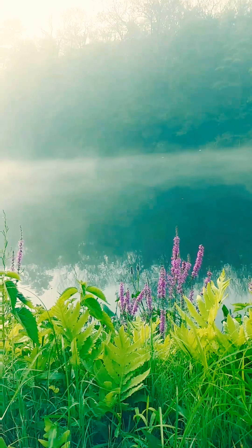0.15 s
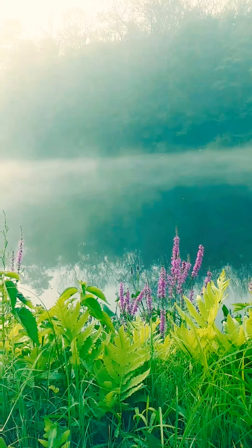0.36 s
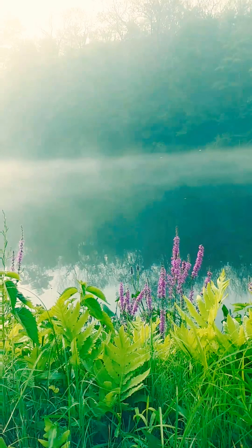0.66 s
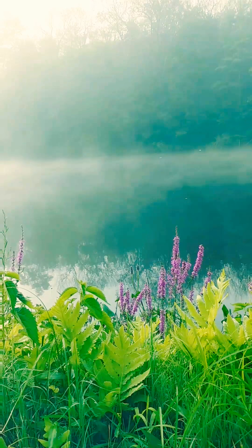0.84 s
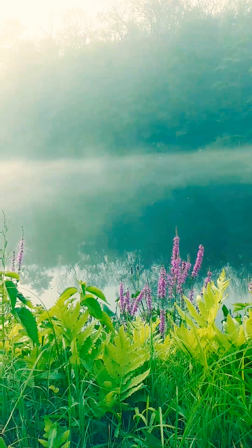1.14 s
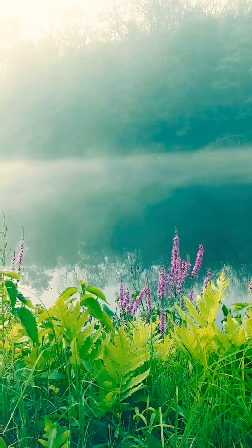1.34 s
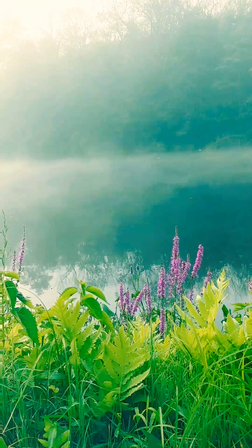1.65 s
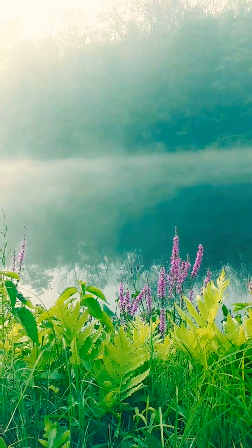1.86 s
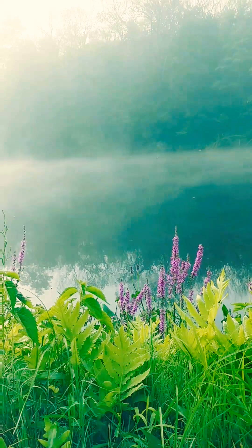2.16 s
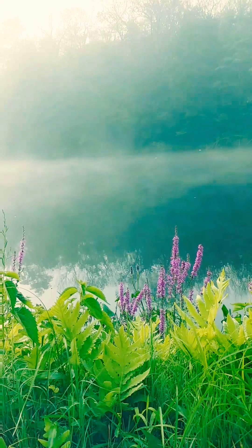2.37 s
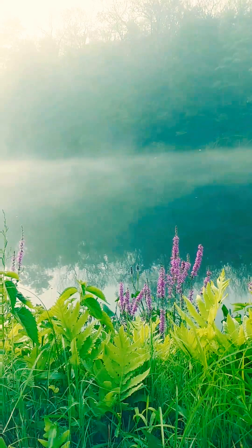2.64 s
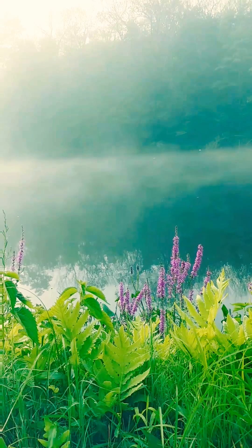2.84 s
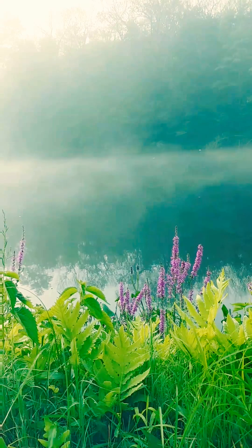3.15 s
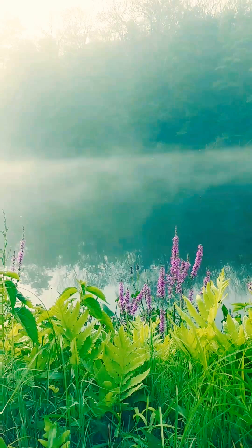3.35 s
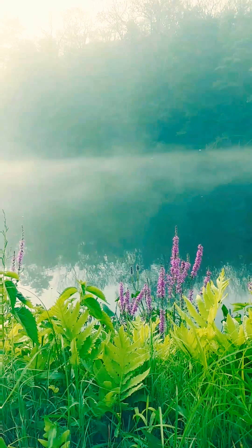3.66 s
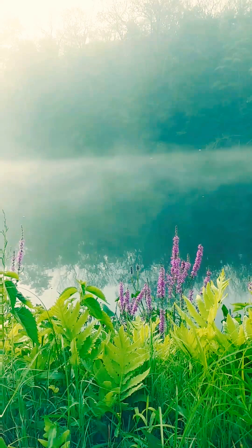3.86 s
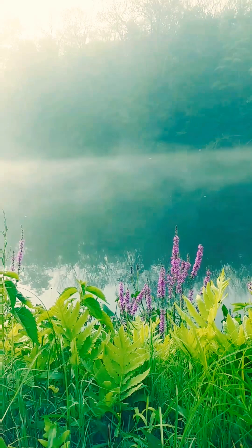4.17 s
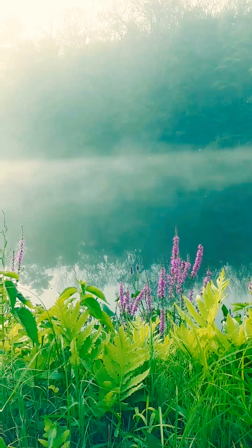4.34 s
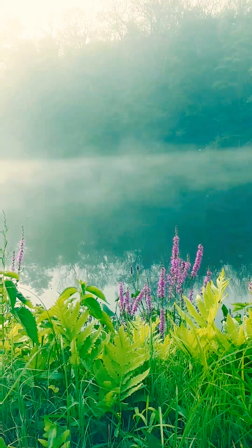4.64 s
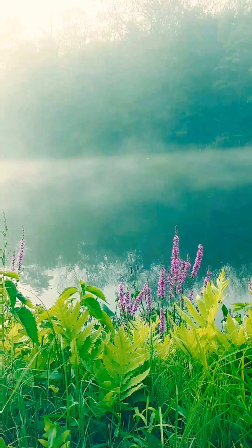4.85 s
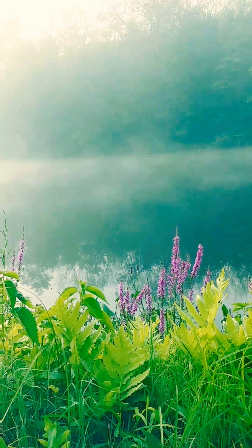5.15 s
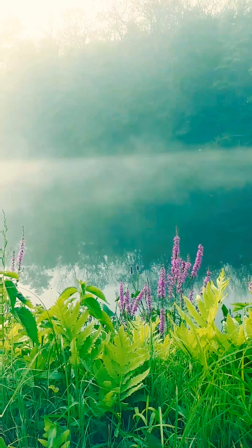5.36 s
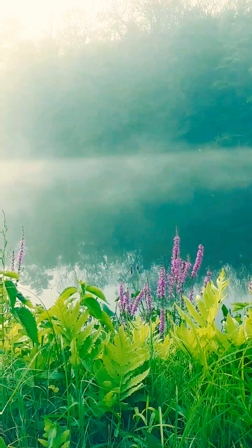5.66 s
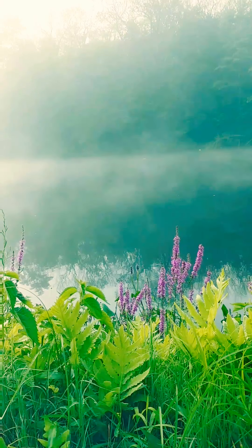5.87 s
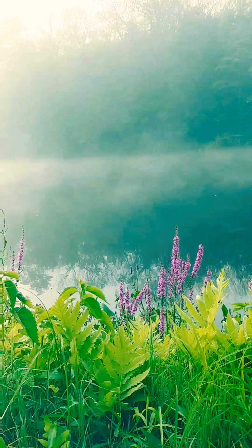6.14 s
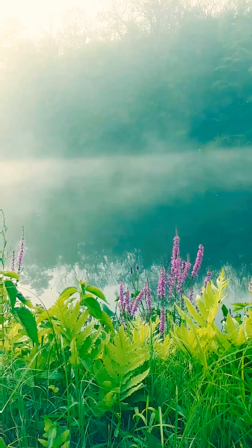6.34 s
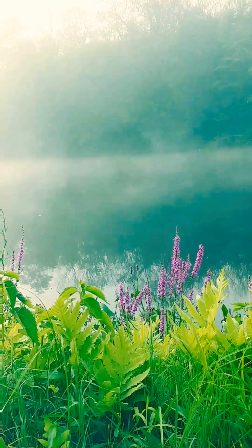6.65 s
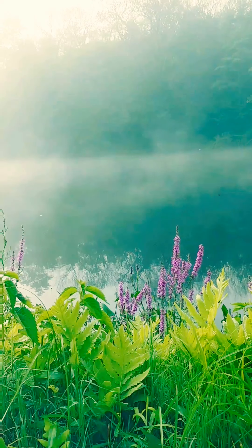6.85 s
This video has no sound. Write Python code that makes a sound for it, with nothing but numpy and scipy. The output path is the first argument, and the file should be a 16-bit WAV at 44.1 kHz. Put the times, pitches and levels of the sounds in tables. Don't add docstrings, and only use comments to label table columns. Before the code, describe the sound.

Bright ratcheting clicks of a fishing reel paying out line race, stall and crawl, with gritty drag rub; crickets chirr quietly behind.

```python
import sys
import numpy as np
from scipy import signal
from scipy.fft import rfft, irfft
from scipy.io import wavfile
from scipy.ndimage import uniform_filter1d

SR = 44100
rng = np.random.default_rng(int(sys.argv[2]) if len(sys.argv) > 2 else 0)


def wav_record(signal):
    frames = np.transpose(np.atleast_2d(signal))
    bounded = np.clip(frames, -1, 1)
    quanta = np.round(bounded * 32767).astype(np.int16)
    wavfile.write(sys.argv[1], SR, quanta)


def gain_from_db(level_db):
    decades = np.asarray(level_db, float) / 20
    return 10 ** decades


N = 308700

# f/Hz, density/dB per Hz
RUMBLE_COLOUR = [(8.8, -9), (15, -0.5), (70, -4.5), (179, -15.5), (447, -28.5), (501, -25.5), (616, -28),
                 (869, -26), (1230, -28), (2030, -35.5), (2800, -34.5), (3140, -37), (3600, -38.5),
                 (4680, -36), (7920, -120)]
# f/Hz, density/dB per Hz
HISS_COLOUR = [(2500, -25), (3800, -2), (7000, 0), (9800, -2.5), (10500, -9), (11300, -4.5), (15200, -5),
               (15800, -20), (17000, -50)]
# f/Hz, density/dB per Hz
CHORUS_COLOUR = [(2180, -26), (3700, -19), (4130, 0), (4470, 6), (5040, 2), (5280, 5), (6180, 5),
                 (6440, -4), (6780, -4), (7000, -66), (9100, -29), (15400, -120)]
RUMBLE_DB, HISS_DB, CHORUS_DB = -58, -71, -64.5
# f/Hz, likeness/1
PORT_LIKENESS = [(60, 0.88), (150, 0.94), (380, 0.39), (950, 0.7), (2380, 0), (5980, 0.0), (15000, 0.0)]
# f/Hz, left minus right/dB
PORT_LEAN = [(60, 2.3), (150, 0), (380, 0.45), (950, 1.7), (2380, 0.14), (5980, 0.28), (15000, 2)]
# f/Hz, chirp rate/Hz, level/dB, left minus right/dB
SINGERS = [(6050, 12.5, -78, 4), (5450, 9.3, -79, .5), (4700, 11.3, -79, .5), (5900, 7.1, -81, -2),
           (4350, 8.4, -82, .5)]
# t/s, length/s, f/Hz, level/dB
TRILLS = [(0.258, 0.14, 6570, -71), (0.583, 0.16, 6460, -75), (1.037, 0.27, 6490, -63),
          (2.195, 0.11, 6550, -78), (2.854, .15, 6550, -67.5), (4.322, 0.11, 6500, -75),
          (4.62, 0.1, 6650, -95), (4.806, 0.13, 6690, -63)]

# t/s, level/dB
BREAKS = [(0.0818, -35), (0.4598, -36), (1.0273, -35), (2.5416, -30.5), (3.4267, -32), (3.5254, -28),
          (4.8551, -31.5), (4.9514, -36.7), (5.6271, -31.5), (5.7205, -27.5), (6.8737, -34), (6.9195, -32)]
BREAK_TEETH = [0, 1, 2, 108, 109, 110, 150, 151, 180, 181, 248, 249]
# tooth number, time per tooth/ms
SURGES = [
    [(3, 29.67), (4, 14.02), (6, 9.75), (16, 8.06), (24, 7.94), (28, 6.96), (47, 8.98), (54, 8.23)],
    [(55, 8.1), (71, 9.48), (74, 11.13), (83, 9.56), (97, 13.98), (98, 13.14), (102, 17.93), (106, 16.41),
     (107, 22.16)],
    [(111, 21.38), (112, 14.16), (119, 11.08), (133, 12.9), (141, 18.62), (144, 40.79), (146, 24.43),
     (148, 24.7), (149, 43.83)],
    [(152, 19.99), (155, 14.06), (158, 28.38), (159, 27.74), (162, 18.96), (164, 22.83), (172, 20.5),
     (176, 15.31), (179, 35.24)],
    [(182, 17.83), (189, 11.08), (197, 10.82), (199, 11.61), (203, 10.18), (208, 13.76), (214, 15.13)],
    [(215, 13.46), (218, 12.64), (221, 24.0), (223, 14.63), (231, 13.37), (238, 17.14), (243, 31.57),
     (245, 25.72), (247, 33.2)],
    [(250, 18.44), (252, 12.48), (254, 15.13)],
]
SURGE_DB = [-29, -28.5, -29.5, -28.5, -28, -28, -28.5]
TOOTH_DB = [2.5, 3.2, -2.1, 0.1, -4, -1.5, -3, -2, -0.1, -1.1, -0.8, 0.3, 2.5, 2.5]
# t/s, level/dB
REBOUNDS = [(4.1018, -48.8), (4.1928, -42.4), (4.9763, -43.6), (5.0329, -25.9), (5.0755, -31.6),
            (5.1399, -45.3), (5.1588, -45.3), (5.2162, -35.8), (5.2598, -37.8), (5.3235, -34.9),
            (5.4332, -44), (5.4332, -44), (5.4816, -41.8), (5.5434, -42.3), (5.5733, -41.0), (5.782, -39.4),
            (6.6587, -46.6), (6.6854, -41.5), (6.7049, -47.6)]
# t/s, level/dB
STRAYS = [(.0002, -56), (0.808, -83), (4.766, -62)]
TEETH = 14
# f/Hz, t60/s, left level/dB, right level/dB
REEL_MODES = [(4097, 0.026, -30, -19.5), (344, 0.0065, -45.5, -47.5), (916, 0.0037, -43.5, -42.5),
              (1207, 0.015, -38, -36), (1370, 0.019, -36, -30), (1690, 0.0085, -37.3, -34),
              (2253, 0.0095, -33.5, -32.5), (2750, 0.0071, -30.1, -27), (3245, 0.0049, -26.5, -21.6),
              (3825, 0.0027, -29, -22), (4170, 0.015, -22.5, -15), (4530, 0.0055, -22, -20),
              (5000, 0.007, -30.5, -15),
              (5564, 0.0046, -22.0, -11), (6160, 0.0038, -24, -8.5), (6740, 0.0033, -15.5, -10.5),
       (7495, 0.0033, -26, -7), (8250, 0.0024, -23, -4.5), (9046, 0.0039, -12, -2), (9680, 0.0017, -7, -11),
       (9630, 0.0024, 1, -15.5), (11040, 0.0033, -15.5, -18.5), (11860, 0.0046, -11.5, -25),
       (12600, 0.0011, -13, -23.4), (13630, 0.0084, -16.5, -24), (14300, .003, -21, -36),
       (14970, 0.0035, -9.5, -32)]
GRIP_DB = [1.1, 1.1, 3, -1, -1, -2.7, -8]
# f/Hz, depth/dB
SWING = [(950, 8), (1330, 8), (1800, 4), (3000, 9), (4120, 2.4), (5500, 3.2), (8500, 1.6), (11000, 3.5)]
# f/Hz, slope/dB per octave
SPEED_GAIN = [(950, 6), (1370, 7), (3300, 3), (4120, 2.5), (4700, 5.5), (8500, 2.05), (11500, 3.5),
              (13500, 2.2)]
# f/Hz, density/dB per Hz
RUB_COLOUR = [(700, -29.5), (1300, 0.5), (2000, -4), (2550, -3), (2900, 8.5), (3300, 7.5), (6000, 12),
              (9000, 4), (10500, 10), (15300, 1.5), (16500, -23)]
RUB_SURGE_DB = [-2.2, -0.1, -2.3, 2.5, -0.9, -3.6, -7.5]

# t/s, level/dB
SWELL = [(1.1, -75), (1.4, -73), (1.85, -64.5), (2.12, -68), (2.38, -70), (2.52, -90)]
# f/Hz, density/dB per Hz
SWELL_COLOUR = [(300, -30), (500, -9), (650, -1), (800, -1), (1000, -7), (1500, -30)]
# t/s, f/Hz, level/dB
BIRD = [(3.14, 2560, -95), (3.2, 2700, -82), (3.3, 2830, -82), (3.36, 2880, -95)]


def evened(x):
    return x / np.sqrt(np.mean(x ** 2) + 1e-20)


def read(points, hz):
    f, value = np.transpose(points)
    return np.interp(np.log(hz + 1), np.log(f + 1), value)


def ring(x, hz, t60_s):
    radius = 10 ** (-3 / (t60_s * SR))
    angle = 2 * np.pi * hz / SR
    poles = [1, -2 * radius * np.cos(angle), radius * radius]
    return signal.lfilter([2 * np.sqrt(1 - radius)], poles, x) * np.sin(angle)


def wash(colour, db, patchy_db):
    hz = np.fft.rfftfreq(1024, 1 / SR)
    a, b, c, d, patches = rng.standard_normal((N // 256 + 5, 513, 5)).T
    patches = uniform_filter1d(patches, size=6, axis=0)
    patches = evened(uniform_filter1d(patches, size=8, axis=1))
    same = np.clip(read(PORT_LIKENESS, hz), -1, 1)[:, None]
    left = a + 1j * b
    right = same * left + np.sqrt(1 - same ** 2) * (c + 1j * d)
    lean_db = read(PORT_LEAN, hz)[:, None] / 2
    level_db = read(colour, hz)[:, None] + patchy_db * patches
    z = np.array([left, right]) * gain_from_db(level_db + np.array([lean_db, -lean_db]))
    noise = signal.istft(z, nperseg=1024, noverlap=768)[1][:, :N]
    return gain_from_db(db) * evened(noise)


def air():
    return wash(RUMBLE_COLOUR, RUMBLE_DB, patchy_db=.7) + wash(HISS_COLOUR, HISS_DB, patchy_db=.5)


def cricket_chorus():
    return wash(CHORUS_COLOUR, CHORUS_DB, patchy_db=3.0)


def far_crickets():
    t, out = np.arange(N) / SR, np.zeros((2, N))
    for hz, rate_hz, db, lean_db in SINGERS:
        drift = 0.18 * evened(uniform_filter1d(rng.standard_normal(N), size=20000))
        turns = rate_hz * t + drift + rng.random()
        chirps = np.maximum(np.sin(2 * np.pi * turns) + 0.34, 0)
        line = evened(ring(rng.standard_normal(N), hz, t60_s=.008))
        out += gain_from_db(db + np.array([[lean_db], [-lean_db]]) / 2) * chirps * line
    return out


def spool():
    bind, bind_tooth = .08, 2
    uneven_per_octave, snap_db_per_octave = 0.13, 1.46
    knots, ms = np.concatenate(SURGES).T
    tooth = np.arange(int(knots[-1]) + 1)
    drag = 1 + bind * np.cos(2 * np.pi * (tooth - bind_tooth) / TEETH)
    gap_s = np.interp(tooth, knots, ms) / 1000 * drag
    pull = np.searchsorted(BREAK_TEETH, tooth, "right") - 1
    run_s = np.cumsum(gap_s)
    start_s, start_db = np.transpose(BREAKS)
    s = start_s[pull] + run_s - run_s[BREAK_TEETH][pull]
    octaves = np.log2(np.clip(1 / np.diff(s, prepend=0), 24, 150) / 70)
    surge = np.searchsorted([rows[-1][0] for rows in SURGES], tooth)
    height_db = np.take(TOOTH_DB, tooth % TEETH) * (1 + uneven_per_octave * octaves)
    db = np.take(SURGE_DB, surge) + height_db + snap_db_per_octave * octaves
    db[BREAK_TEETH] = start_db
    return s, octaves, db, surge


def spring_blows(count):
    kinship = .5
    alike = .62
    t = np.arange(1800) / SR
    after_s = t - .002
    after_ms = after_s * 1000
    landed = after_s >= 0
    slip = gain_from_db(-7 + 12 * after_ms) * (after_s < 0)
    landing, chatter = gain_from_db(-44 * after_ms), gain_from_db(-6.5 - 5 * after_ms)
    blow = slip + landed * (landing + chatter)
    fade = np.clip((t[-1] - t) / .01, 0, 1)
    near_echoes = gain_from_db(-16.5 - 60 * t / .058) * fade * landed
    common, own, lumps = np.moveaxis(rng.standard_normal((count, len(t), 3)), 2, 0)
    common = evened(signal.lfilter([1], [1, -kinship], common, axis=0))
    own = evened(signal.lfilter([1], [1, -kinship], own, axis=0))
    lumps = gain_from_db(1.6 * evened(uniform_filter1d(lumps, size=14, axis=1)))
    left = alike * common + np.sqrt(1 - alike ** 2) * own
    drive = np.array([left, common]) * (blow * lumps + near_echoes)
    first_contact = gain_from_db(11) * landed * np.exp(-np.maximum(after_s, 0) / .00002)
    return drive + first_contact


def reel():
    facing_tooth = 5.6
    grip_below_hz = 2000
    fft_size = 2560
    s, octaves, db, surge = spool()
    extra_s, extra_db = np.transpose(REBOUNDS + STRAYS)
    last_tooth = np.maximum(np.searchsorted(s, extra_s) - 1, 0)
    tooth = np.concatenate([np.arange(len(s)), last_tooth])
    s, db, octaves = np.append(s, extra_s), np.append(db, extra_db), octaves[tooth]

    hz, t60_s, left_db, right_db = np.transpose(REEL_MODES)[:, None]
    facing = np.cos(2 * np.pi * (tooth[:, None] - facing_tooth) / TEETH)
    share_db = read(SWING, hz) * facing + read(SPEED_GAIN, hz) * octaves[:, None]
    share_db += np.take(GRIP_DB, surge[tooth])[:, None] * (hz < grip_below_hz)
    share = gain_from_db(share_db + 1.5 * rng.standard_normal(share_db.shape))

    f = np.fft.rfftfreq(fft_size, 1 / SR)
    width_hz = 2.2 / np.clip(t60_s.T, .002, .06)
    resonance = 1j * width_hz * f / (hz.T ** 2 - f ** 2 + 1j * width_hz * f)
    modes = resonance ** 2 / np.sqrt(width_hz)
    modes *= (-1.) ** np.arange(len(modes))[:, None]
    colour = np.array([(share * gain_from_db(port_db)) @ modes for port_db in (left_db, right_db)])
    clicks = irfft(rfft(spring_blows(len(s)), fft_size) * colour)
    first_power = np.mean(np.sum(clicks[:, :, 70:330] ** 2, axis=0), axis=1)
    clicks = clicks * (gain_from_db(db + 2.08) / np.sqrt(first_power))[:, None]

    out = np.zeros((2, N + 3000))
    for port, early in enumerate((111, 100)):
        start = np.round(s * SR).astype(int)[:, None] + 200 - early
        at = start + np.arange(clicks.shape[2])
        out[port] = np.bincount(at.ravel(), clicks[port].ravel(), out.shape[1])
    return out[:, 200:N + 200]


def rub():
    rub_db, rub_db_per_octave = -51.5, 8
    s, octaves, _, surge = spool()
    ahead = np.minimum(np.searchsorted(s, np.arange(N) / SR), len(s) - 1)
    level_db = rub_db + rub_db_per_octave * octaves[ahead] + np.take(RUB_SURGE_DB, surge[ahead])
    level = gain_from_db(level_db) * ~np.isin(ahead, BREAK_TEETH)
    level = uniform_filter1d(level, size=900)
    grit = evened(gain_from_db(2.0 * evened(uniform_filter1d(rng.standard_normal(N), size=60))))
    return gain_from_db(np.array([[-3.5], [2.5]])) * level * grit * wash(RUB_COLOUR, db=5, patchy_db=2)


def near_cricket():
    t, out = np.arange(N) / SR, np.zeros((2, N))
    for start_s, length_s, hz, db in TRILLS:
        first = round(start_s * SR)
        part = slice(first, first + 8000)
        edge_s = np.minimum(t[part] - start_s, start_s + length_s - t[part])
        on = np.clip(edge_s / 0.0069, 0, 1)
        strokes = 1 + 0.57 * np.sin(2 * np.pi * 52 * t[part])
        line = evened(ring(rng.standard_normal(len(on)), hz, t60_s=.035))
        out[:, part] += gain_from_db(db + np.array([[1.5], [-1.5]])) * on * strokes * line
    return out


def swell():
    s, db = np.transpose(SWELL)
    level = gain_from_db(np.interp(np.arange(N) / SR, s, db, -120, -120))
    return level * wash(SWELL_COLOUR, db=0, patchy_db=1)


def bird():
    s, hz, db = np.transpose(BIRD)
    t = np.arange(N) / SR
    phase = 2 * np.pi * np.cumsum(np.interp(t, s, hz)) / SR
    return gain_from_db(np.interp(t, s, db, -150, -150)) * np.sin(phase)


def scene():
    background = air() + cricket_chorus() + far_crickets() + near_cricket() + swell() + bird()
    return background + reel() + rub()


def band_limit(x):
    return signal.sosfilt(signal.butter(12, 16980, fs=SR, output="sos"), x)


def record(dry):
    dipped = 0.51 * dry + 0.41 * signal.lfilter(*signal.iirnotch(10600, 9, SR), dry)
    lowpass = signal.firwin(301, 15800, window=("kaiser", 4), fs=SR)
    limited = signal.oaconvolve(dipped, lowpass[None], "same")
    return band_limit(limited - .0005)


dry = scene()
out = record(dry)
wav_record(out)
```